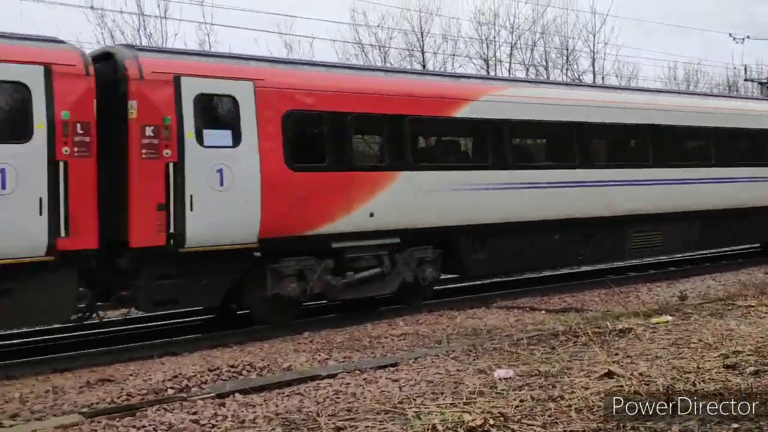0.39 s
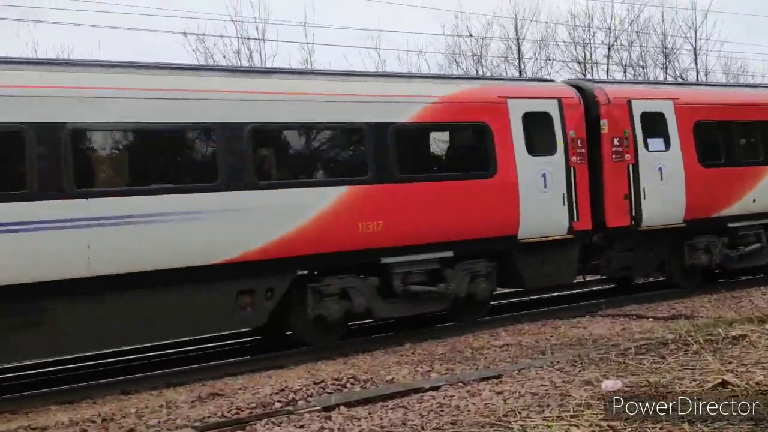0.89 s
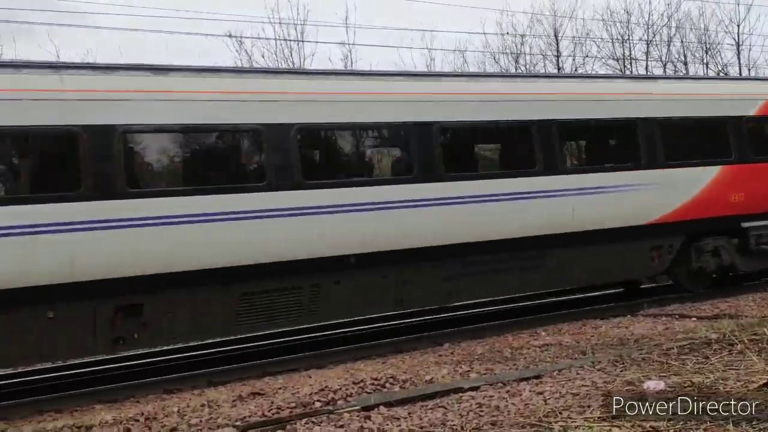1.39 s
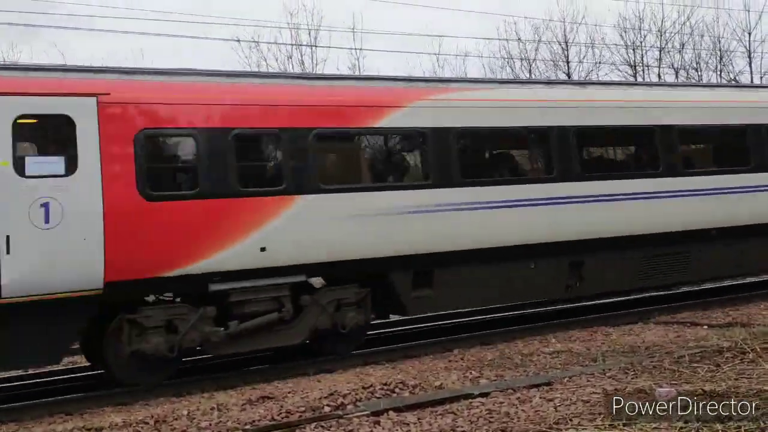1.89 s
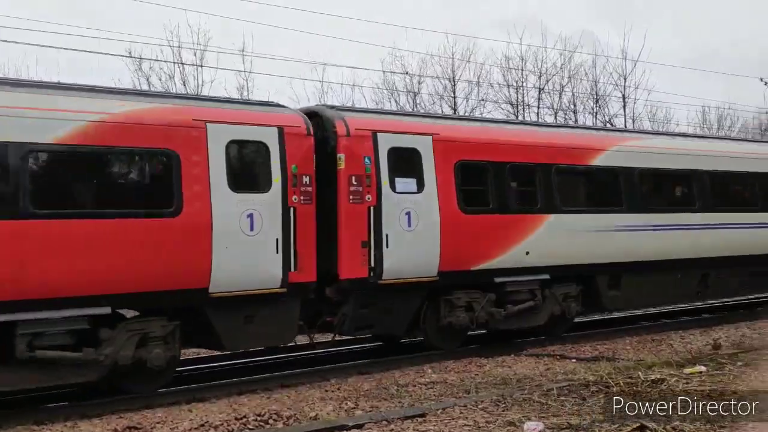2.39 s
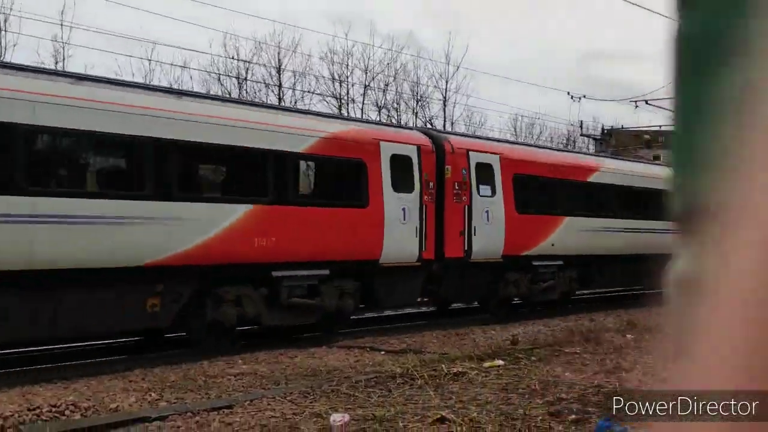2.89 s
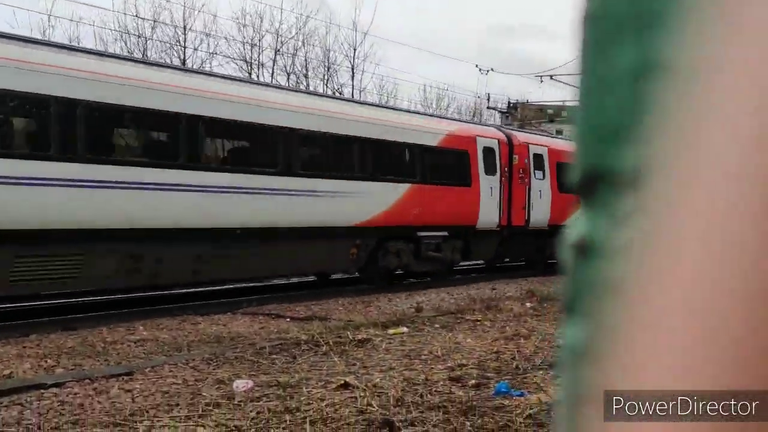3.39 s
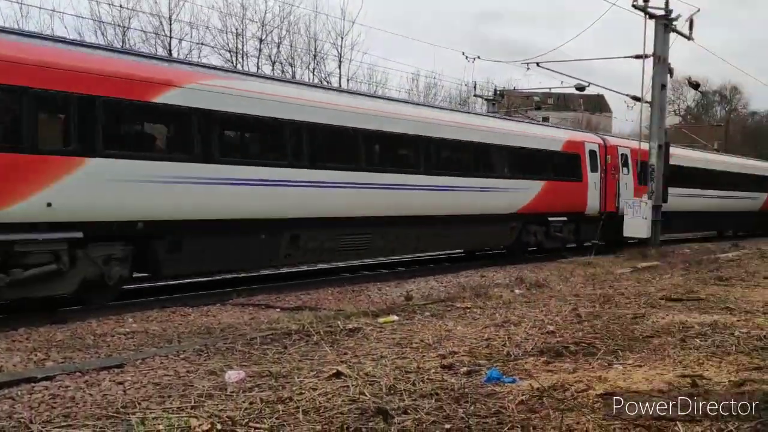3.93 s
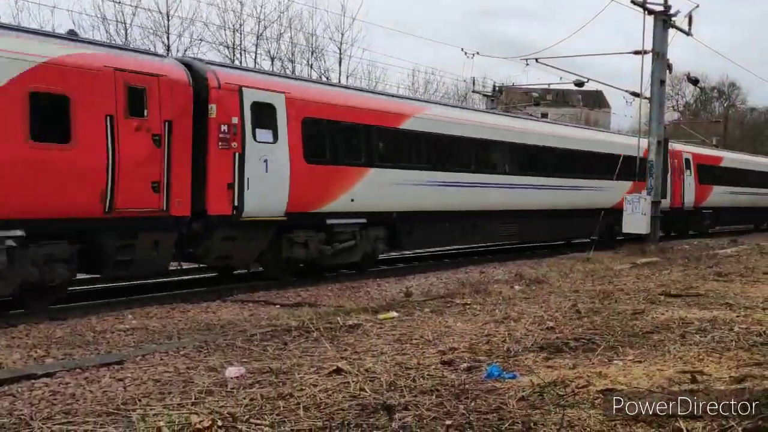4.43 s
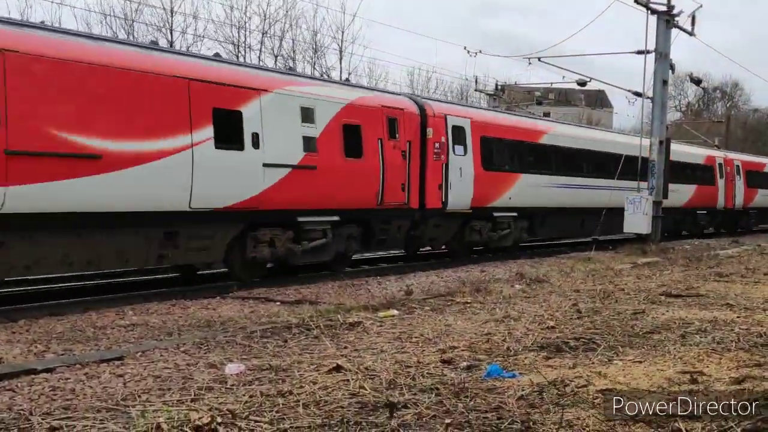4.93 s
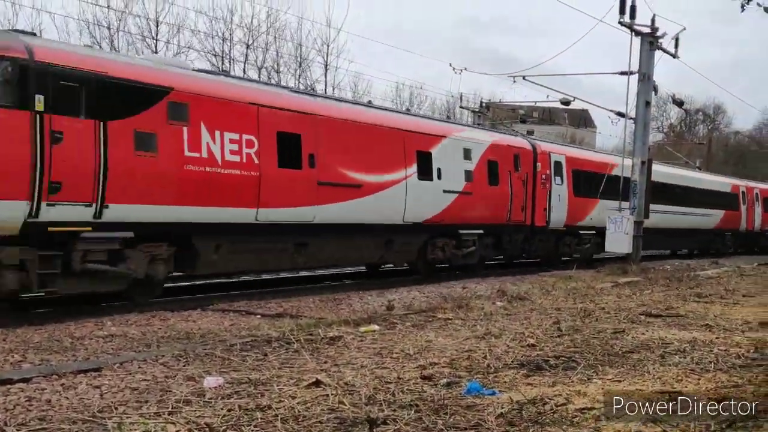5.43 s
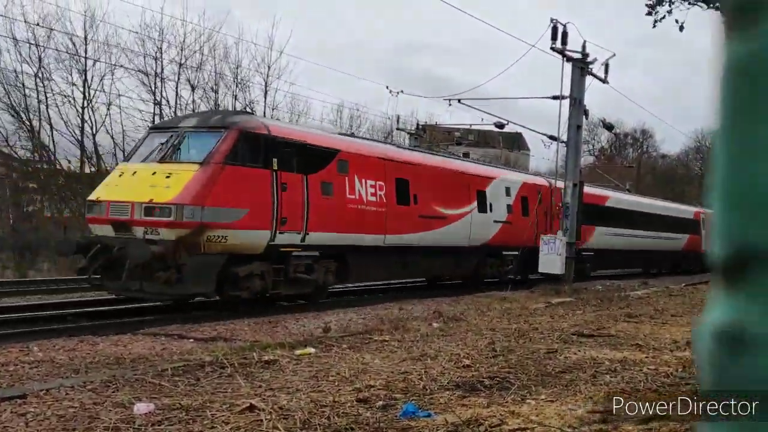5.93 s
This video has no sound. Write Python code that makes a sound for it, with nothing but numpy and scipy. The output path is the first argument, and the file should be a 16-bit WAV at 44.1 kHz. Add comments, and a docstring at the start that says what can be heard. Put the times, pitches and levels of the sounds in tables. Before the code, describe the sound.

Passenger coaches roll past close by, wheel flanges hissing brightly over low rumble and paired axle thumps, before the hiss fades and wind buffets the microphone.

```python
"""Bright flange hiss opens, soon with axle thumps over a rail joint, as passenger coaches roll past close by on a curve.
Hiss: banded noise that drives ringing wheel modes; bites, rough notes, hiss patches and thin whistles stand out of it.
Thumps: damped tone bursts with rattle and clatter. Treads: rumble and roar in noise bands. Loose metal clanks.
Wind: lumpy low noise and short buffets at two unlike microphone ports."""
import sys
import numpy as np
from scipy import signal
from scipy.fft import rfft, irfft, next_fast_len
from scipy.io import wavfile
from scipy.ndimage import uniform_filter1d

SR = 44100
rng = np.random.default_rng(int(sys.argv[2]) if len(sys.argv) > 2 else 0)


def dump_mix(stems):
    """Bounce the given channels to the path in sys.argv[1] as a 16-bit WAV at rate SR."""
    frames = np.atleast_2d(stems).T  # one column per channel
    limited = np.clip(frames, -1, 1)  # hard clip at full scale
    pcm = np.round(limited * 32767).astype(np.int16)
    wavfile.write(sys.argv[1], SR, pcm)


def how_loud(loudness_db):
    """Turn decibels into a plain amplitude multiplier (0 dB gives 1, 20 dB gives 10)."""
    steps = np.asarray(loudness_db, float) / 20
    return 10 ** steps


N = 267246

# All levels are relative.
# port response: f/Hz, left over right/dB
PORT_BALANCE = [(60, -7), (110, -7), (200, -5.5), (380, -3), (700, -1.5), (1290, -7), (2380, -3.5),
                (4400, -7), (8120, -1), (15000, 26)]
# left-right likeness of noise: f/Hz, common power share/1
PORT_LIKENESS = [(60, .6), (120, 0.85), (260, .8), (500, .6), (900, 0.4), (1800, 0.35), (4000, 0.15),
                 (15000, 0.03)]
# wind: t/s, level/dB, left over right/dB
WIND_COURSE = [(0.0, -32, 3), (0.22, -34, -22), (0.45, -34.5, 2), (0.78, -30.5, -7), (1.25, -25.5, -5),
               (1.36, -30.5, -0.5), (1.95, -32.5, -4), (2.35, -34, 0), (2.6, -35, -1), (2.88, -31.5, 0),
               (3.0, -35, -7), (3.6, -26, -15), (3.8, -37.5, -18), (4.75, -32.5, -6), (4.9, -32, -4),
               (5.15, -30.5, 3), (5.6, -36.5, 1), (5.77, -18.5, -14), (5.815, -26.5, -3), (5.87, -22.5, -9),
               (5.94, -31, 0), (5.98, -12.5, -19), (6.06, -20, -20)]
# buffets at each port: onset t/s, level/dB, time to peak/s
LEFT_PORT_BUFFETS = [(5.65, -13, 0.0068), (5.73, -16, 0.014), (5.76, -17, 0.017), (5.78, -22, 0.0073),
                     (5.823, -22, .006), (5.895, -21, 0.0077), (5.95, -15.5, .012), (5.98, -17, 0.0051),
                     (6.04, -14, .005)]
RIGHT_PORT_BUFFETS = [(0.791, -20.5, 0.02), (1.129, -22, 0.011), (3.326, -22, 0.0083), (3.412, -27, 0.012),
                      (1.937, -14.5, 0.0079), (3.206, -26, 0.011), (3.589, -22, 0.0087),
                      (3.874, -22.5, 0.023), (5.735, -12, 0.0083), (5.764, -16.5, 0.0058),
                      (5.788, -18, 0.0041), (5.834, -30, .01), (5.859, -7, 0.012), (5.9, -11.5, 0.01),
                      (5.919, -24, 0.0058), (5.965, -9, 0.0078), (5.987, -11, 0.0067),
                      (5.999, -12.5, 0.011), (6.025, -10.5, 0.0085)]
# faint treble hiss under the train: f/Hz, density/dB
HISS_FLOOR_SPECTRUM = [(2350, -33), (4000, -8), (6260, -9), (8590, -26), (12600, 17), (15800, -34)]
# treads on the rail: t/s, rumble level/dB, roar level/dB
TREAD_COURSE = [(0.0, -30, -38.5), (0.64, -38, -40), (0.8, -23, -40), (1.0, -28, -39), (1.3, -30, -39.5),
                (1.7, -28.5, -39), (2.38, -38, -42), (2.8, -28, -37), (3.3, -31, -39), (3.7, -29.5, -41.5),
                (4.5, -31, -39), (4.85, -34, -41), (5.2, -31.5, -39), (5.5, -34, -41.5), (6.06, -23.5, -50)]
# tread spectra: f/Hz, density/dB
RUMBLE_SPECTRUM = [(35, -32), (60, 2.5), (140, -2.5), (241, -0.5), (301, -25.5), (375, -14), (420, -15),
                   (550, -45), (920, -120)]
ROAR_SPECTRUM = [(180, -31), (300, -1), (384, -3.5), (608, -9.5), (1120, -13), (1540, -8), (1690, -9.5),
                 (1860, -27), (2300, -6.5), (3160, -13.5), (3950, -14), (5000, -12), (6500, -42),
                 (11000, -120)]
# rail resonances in the roar: f/Hz, width/Hz, level/dB
RAIL_RESONANCES = [(1692, 25, -9.5), (2268, 63, -10)]
# loose metal under the coaches: t/s, f/Hz, level/dB
METAL_CLANKS = [(.722, 880, -36), (.915, 620, -30), (.945, 800, -38), (1.325, 736, -31.5), (1.51, 850, -31),
                (2.15, 680, -38), (2.435, 950, -33), (2.565, 680, -29), (2.715, 685, -30),
                (2.755, 820, -34), (4.93, 770, -27), (5.11, 1030, -31), (5.115, 1390, -29),
                (5.12, 560, -30), (5.355, 2320, -32), (5.355, 1970, -37)]
# bogies over the joint: t/s, first axle level/dB, second axle level/dB, later knock level/dB, axle f/Hz
BOGIE_HITS = [(0.151, -19.5, -14.5, -25.5, 147), (0.719, -17, -13.5, -21, 150.6),
              (1.946, -19.5, -15.5, -25, 152), (2.518, -15.5, -15.5, -26.5, 148.5),
              (3.748, -20, -16.5, -33, 142), (4.321, -17.5, -15, -26, 147), (5.158, -17, -15.5, -42, 145)]
# other knocks, some of them axles near the end: t/s, level/dB, f/Hz
OTHER_KNOCKS = [(.893, -25, 173), (0.956, -24, 254), (0.986, -24, 238), (2.041, -32, 110), (2.75, -25, 250),
                (2.84, -22.5, 93), (3.415, -24, 109), (5.572, -21, 147), (1.519, -19, 103),
                (1.686, -23.5, 139), (4.052, -20.5, 100), (4.804, -20, 121), (4.939, -28, 220),
                (5.071, -21, 120), (5.105, -15, 117), (5.289, -20, 136)]
# thin whistles, steady or sliding: t/s, length/s, from f/Hz, to f/Hz, level/dB
THIN_WHISTLES = [(3.515, .09, 10950, 11950, -28), (1.87, .11, 13280, 13380, -29),
                 (3.75, .07, 11780, 11850, -22), (3.94, .11, 11900, 11950, -28),
                 (1.49, .08, 12850, 12900, -29), (2.04, .07, 13650, 13550, -29),
                 (2.11, .07, 13150, 13150, -29), (3.85, .1, 12800, 12900, -31)]
# rough notes and broader patches of treble hiss: t/s, half length/s, f/Hz, level/dB, width/Hz
ROUGH_NOTES = [(0.13, 0.092, 8560, -29, 40), (0.166, 0.39, 14900, -35, 60), (0.278, 0.24, 10700, -39, 40),
               (1.121, 0.24, 13500, -21, 400), (1.278, 0.15, 13200, -17, 700),
               (1.302, 0.077, 5490, -26, 60), (1.402, 0.071, 9400, -23.5, 50),
               (1.479, 0.085, 13300, -20, 250), (1.582, 0.15, 13150, -20, 200),
               (2.012, 0.1, 13200, -19.5, 400), (2.103, 0.24, 13300, -23, 250),
               (2.885, 0.083, 13560, -16, 450), (3.27, 0.095, 6180, -22, 60),
               (3.103, 0.17, 13100, -22, 400), (3.367, 0.18, 14500, -21.5, 100),
               (3.509, 0.094, 11170, -19, 250), (3.549, 0.1, 11950, -22.5, 350),
               (3.668, 0.17, 11800, -16.5, 450), (3.693, 0.05, 11830, -14, 300),
               (3.71, .04, 13200, -27, 150), (1.3, 0.1, 13800, -21, 250), (2.31, .07, 13700, -24, 300),
               (3.734, 0.08, 5310, -26, 45), (3.836, 0.17, 11880, -22, 200), (3.84, 0.13, 12800, -23, 400),
               (3.93, 0.074, 11300, -22, 200), (4.06, .3, 3470, -33.5, 1400),
               (3.052, 0.23, 3600, -45, 1400), (4.195, 0.12, 2170, -34, 90), (4.226, 0.1, 3490, -31, 40),
               (4.62, 0.15, 13200, -34, 60), (4.66, .12, 10600, -39, 40), (5.006, 0.17, 12900, -29, 400),
               (5.008, 0.051, 8400, -39, 900), (5.03, 0.17, 6100, -33.5, 300),
               (5.41, 0.21, 12400, -30.5, 1000), (5.857, 0.11, 7700, -38, 700),
               (5.848, 0.092, 11600, -30, 900)]
# sudden flange bites: t/s, level/dB, half rise time/s, fade time constant/s, lowest f/Hz, ring f/Hz, ring level/dB
FLANGE_BITES = [(0.526, -40, .004, 0.017, 6500, 13300, -54), (2.599, -32, .002, 0.0086, 5000, 12900, -36),
                (4.059, -35, .002, 0.024, 3200, 8000, -38), (5.0065, -21.5, .002, 0.012, 8000, 12800, -22),
                (5.353, -30, 0.0025, 0.016, 2500, 6540, -29),
                (5.8446, -18, 0.0026, 0.015, 6900, 7460, -17.5)]
# flange on rail side: t/s, hiss level/dB, lower-treble tilt/dB (its mean is taken off)
RUB_COURSE = [(0.0, -20.5, -7.5), (0.17, -19, -4.5), (0.3, -26, -5.5), (0.522, -46, 7.5), (0.532, -23, -17),
              (0.66, -21.5, -9), (0.79, -31.5, 3), (0.84, -24, -4.5), (1.4, -26.5, -4.5), (1.9, -24, -3),
              (2.22, -35.5, 4), (2.38, -24, -8.5), (2.595, -29.5, 0), (2.603, -23, 0), (2.75, -21, -8),
              (2.97, -21, -5.5), (3.2, -19.5, -1.5), (3.6, -26, -4), (3.815, -26.5, -7.5), (3.83, -24, -2),
              (4.054, -27.5, -3.5), (4.063, -18.5, -9.5), (4.3, -19.5, -6), (4.62, -23, -0.5),
              (4.78, -42, -6), (5.005, -39, 1.5), (5.012, -26.5, -7), (5.28, -42.5, 0), (5.33, -60, 12),
              (5.39, -48, 4), (5.41, -38.5, -7.5), (5.49, -32, -8.5), (5.7, -45.5, 4), (5.83, -49, 7),
              (5.87, -34, -33), (6.06, -35, -18)]
# topmost treble of the rubbing: t/s, tilt/dB
TOP_COURSE = [(0, -4), (.55, 8), (1.1, 2.5), (2.4, 9), (3.5, -11), (3.8, 0), (4.1, -7), (4.8, 1),
              (5.1, -12), (6.06, -23)]
# rubbing hiss: f/Hz, density/dB
RUB_SPECTRUM = [(1760, -48), (3000, -17), (3520, -10.5), (3910, -7), (4220, -13), (5020, -5.5), (5270, -3),
                (6220, -4), (6720, -2.5), (10100, -5), (11600, 5), (12600, -3.5), (13700, -1), (14800, 2),
                (15800, -8.5)]
# wheel disc modes: nominal f/Hz, level/dB, t60/s
WHEEL_MODES = [(2750, -44, .15), (3550, -38, .15), (4400, -38, .15), (5350, -36, .12), (6200, -32, .12),
               (6750, -32, .15), (7260, -31, .15), (8000, -31, .15), (8550, -32, .15), (9220, -31, .2),
               (9900, -33, .15), (10660, -30, .25), (11200, -31, .06), (11840, -29, .06), (12400, -31, .06),
               (12960, -29, .08), (13300, -28, .15), (13800, -29, .08), (14300, -33, .15),
               (14700, -33, .15), (15280, -34, .15)]


def rms_one(x):
    """Level 1 for the mean of the channels."""
    return x / np.sqrt(np.mean(np.atleast_2d(x).mean(0) ** 2) + 1e-20)


def in_time(rows):
    """Curve columns at every sample."""
    s, *columns = np.transpose(rows)
    return [np.interp(np.arange(N) / SR, s, c) for c in columns]


def at_hz(points, hz):
    """A spectrum read on a log axis."""
    points_hz, values = np.transpose(points)
    return np.interp(np.log(hz), np.log(points_hz), values)


def drift(rate_hz):
    """Slow chance of spread 1: noise through two equal poles at rate_hz, at SR / 40."""
    r = np.exp(-80 * np.pi * rate_hz / SR)
    slow = signal.lfilter([1], [1, -2 * r, r * r], rng.standard_normal(N // 40 + 2002))[2000:]
    return np.interp(np.arange(N) / 40, np.arange(len(slow)), rms_one(slow))


def flicker(spread_db, rate_hz, low, high):
    """Gain that drifts in dB, clipped at low and high spreads."""
    return how_loud(spread_db * np.clip(drift(rate_hz), low, high))


def band_pass(x, low_hz, high_hz, order=2):
    """Butterworth band."""
    return signal.sosfilt(signal.butter(order, [low_hz, high_hz], "band", fs=SR, output="sos"), x)


def resonance(x, hz, width_hz):
    """Two poles, gain 1 on top."""
    r = np.exp(-np.pi * width_hz / SR)
    poles = [1, -2 * r * np.cos(2 * np.pi * hz / SR), r * r]
    return signal.lfilter([(1 - r * r) / 2, 0, (r * r - 1) / 2], poles, x + 1e-18)


def panned(db):
    """Gains of the two sides for a left-over-right step; their power adds to 4."""
    left = 1 / (1 + how_loud(-2 * np.asarray(db)))
    return 2 * np.sqrt(np.array([left, 1 - left]).reshape(2, -1))


def pair(hz, size=N):
    """White noise at the two ports, partly alike, weighted by the ports' response."""
    alike = np.clip(at_hz(PORT_LIKENESS, hz), 0, 1)
    common, left, right = rng.standard_normal((3, size))
    own = np.array([left, right])
    return panned(at_hz(PORT_BALANCE, hz)) * (np.sqrt(alike) * common + np.sqrt(1 - alike) * own)


def banded_noise(spectrum, edges_hz, patchy_db, rate_hz, lower_db=0, upper_db=0, knees_hz=(9500, 13600)):
    """Bands of noise, each flickering partly on its own; two tilts move the bands outside the knees."""
    out, together = 0, drift(rate_hz)
    for low, high in zip(edges_hz, edges_hz[1:]):
        hz = np.sqrt(low * high)
        band = band_pass(pair(hz), low, high)
        tilt_db = lower_db / (1 + (hz / knees_hz[0]) ** 6) + upper_db / (1 + (knees_hz[1] / hz) ** 16)
        flicker_db = patchy_db * (0.31 * together + np.clip(drift(rate_hz), -2.5, 1.6))
        out = out + band * how_loud(at_hz(spectrum, hz) + tilt_db + flicker_db)
    return out


def wind():
    """Lumpy turbulence, partly its own at each port; a wandering upper edge rides on the bass."""
    bass_db, pan_db = in_time(WIND_COURSE)
    edge_gain = how_loud(-17.5 + 7.5 * np.clip(drift(2.4), -2, 1.2))
    lumps = np.array([flicker(4.0, 9.3, -2, 1.5), flicker(3.2, 40.0, -2, 1.1)])  # left, right
    air = rng.standard_normal((2, N)) + 1.1 * rng.standard_normal(N)
    bass = band_pass(air, 22, 130)
    edge = band_pass(air, 130, 400)
    gust = lumps * bass / np.std(bass) + edge_gain * lumps * edge / np.std(edge)
    return how_loud(bass_db) * panned(pan_db) * gust


def buffets():
    """Short bursts of turbulence, each port its own, steeply duller towards the treble; hard ones crackle."""
    crackle_db = -24
    t, out = np.arange(N) / SR, np.zeros((2, N))
    for side, (rows, cut_hz) in enumerate([(LEFT_PORT_BUFFETS, 190), (RIGHT_PORT_BUFFETS, 675)]):
        shape = np.zeros(N)
        for s, db, peak_s in rows:
            span = slice(int(s * SR) + 1, int((s + 5 * peak_s) * SR))
            age = (t[span] - s) / peak_s
            shape[span] += how_loud(db) * age * np.exp((1 - age ** 2) / 2)
        air, grit = rng.standard_normal((2, N))
        air = band_pass(air, 70, 330, order=1)
        air = signal.sosfilt(signal.butter(2, cut_hz, fs=SR, output="sos"), air)
        air = air / np.sqrt(uniform_filter1d(air ** 2, size=900) + 1e-12)  # every buffet at full strength
        grit = rms_one(band_pass(grit, 800, 3200))
        crackle = how_loud(crackle_db) * shape ** 2 / shape.max() * how_loud(3.7 * drift(90.0)) * grit
        out[side] = shape * rms_one(air) + crackle
    return out


def hiss_floor():
    """Faint flickering treble hiss under the train, in noise bands."""
    edges_hz = np.geomspace(4000, 16000, 6)
    return how_loud(-41) * rms_one(banded_noise(HISS_FLOOR_SPECTRUM, edges_hz, patchy_db=-5.0, rate_hz=1.76))


def treads():
    """Rough wheels on rough rail: a rumble from the track and a roar with two rail resonances."""
    rumble_db, roar_db = in_time(TREAD_COURSE)
    rumble = rms_one(banded_noise(RUMBLE_SPECTRUM, np.geomspace(60, 400, 8), patchy_db=5.0, rate_hz=14.0))
    roar = banded_noise(ROAR_SPECTRUM, np.geomspace(350, 5000, 12), patchy_db=3.5, rate_hz=16.6)
    roar = how_loud(2.0) * rms_one(roar)
    for hz, width_hz, db in RAIL_RESONANCES:
        ring = rms_one(resonance(pair(hz), hz, width_hz))
        roar = roar + how_loud(db) * flicker(3.0, 7.0, -2, 1.2) * ring
    return how_loud(rumble_db) * rumble + how_loud(roar_db) * roar


def clanks():
    """Loose metal: short rough rings of one pitch each."""
    peak_s, width_hz = 0.011, 120
    out, age = np.zeros((2, N)), np.arange(SR // 8) / SR / peak_s
    for s, hz, db in METAL_CLANKS:
        common, left, right = rng.standard_normal((3, len(age)))
        ring = resonance(common + 0.68 * np.array([left, right]), hz, width_hz)
        ring = ring * age * np.exp(1 - age)
        at = int(s * SR)
        out[:, at:at + len(age)] += how_loud(db) * panned(-2.2) * ring / np.abs(ring).max()
    return out


def thumps():
    """Sleeper and ballast give way in a few cycles; a weaker rebound, a puff of rattle, a lumpy clatter."""
    wheelbase_s, later_knock_s, later_knock_hz = .193, .398, 140  # both delays after the first axle
    pan_db, rattle_db, rattle_spread_db = -2.5, -7, 2
    clatter_db, clatter_s = -2.5, 0.028
    hits = []
    for s, first_db, second_db, later_db, hz in BOGIE_HITS:
        hits += [(s, first_db, hz), (s + wheelbase_s, second_db, hz), (s + later_knock_s, later_db, later_knock_hz)]
    hits += OTHER_KNOCKS
    out, t = np.zeros((2, N + SR)), np.arange(SR // 4) / SR
    rattles = band_pass(rng.standard_normal((len(hits), 2, len(t))), 220, 900)
    clatters = band_pass(rng.standard_normal(rattles.shape), 110, 330)
    rattles = rattles + rattles.mean(1, keepdims=True)  # partly alike at the two ports
    clatters = clatters + clatters.mean(1, keepdims=True)
    sides = how_loud(np.array([[pan_db / 2], [-pan_db / 2]]))
    chances = rng.standard_normal(len(hits))
    for (s, db, hz), rattle, clatter, chance in zip(hits, rattles, clatters, chances):
        blow = np.exp(-((t - .011) / 0.0084) ** 2) * np.cos(2 * np.pi * hz * (t - .011))
        rebound = 0.34 * np.exp(-((t - .048) / 0.02) ** 2) * np.cos(2 * np.pi * hz * (t - .048))
        puff = rattle * (1 - np.exp(-t / 0.0047)) * np.exp(-t / 0.019)
        puff = how_loud(rattle_db + rattle_spread_db * chance) * puff
        tail = how_loud(clatter_db) * clatter * t / clatter_s * np.exp(1 - t / clatter_s)
        at = int(s * SR)
        out[:, at:at + len(t)] += how_loud(db + 4.0) * sides * (blow + rebound + puff + tail)
    return out[:, :N]


def whistles():
    """Thin wavering whistles, steady or sliding, mostly at the left port: sines of wandering frequency."""
    waver_hz = 45 * drift(45.0)
    out, ragged = np.zeros((2, N)), flicker(3.0, 30.0, -2, 1.2)
    for s, length_s, from_hz, to_hz, db in THIN_WHISTLES:
        span = slice(int(s * SR), int((s + length_s) * SR))
        age = np.linspace(0, 1, span.stop - span.start)
        hz = from_hz + (to_hz - from_hz) * np.sin(np.pi / 2 * age) + waver_hz[span]
        whistle = np.sin(2 * np.pi * np.cumsum(hz) / SR)
        swell = np.sqrt(2 * np.sin(np.pi * age)) * ragged[span]
        out[:, span] += how_loud(db) * swell * panned(at_hz(PORT_BALANCE, to_hz)) * whistle
    return out


def rough_notes():
    """Rough notes and broader patches of treble hiss, swelling and dying away: resonant noise."""
    out, t = np.zeros((2, N)), np.arange(N) / SR
    ragged = flicker(2.6, 11.0, -2, 1.2)  # the grip comes and goes
    for s, half_s, hz, db, width_hz in ROUGH_NOTES:
        span = slice(int(s * SR), int((s + 2 * half_s) * SR))
        age = (t[span] - s) / half_s
        common, left, right = rng.standard_normal((3, len(age)))
        note = resonance(common + 1.1 * np.array([left, right]), hz, width_hz)
        note = resonance(note, hz, 3.9 * width_hz)
        swell = np.sin(np.pi * np.clip(age / 2, 0, 1) ** .5) * ragged[span]
        out[:, span] += how_loud(db) * swell * panned(at_hz(PORT_BALANCE, hz)) * note / np.std(note) / 2
    return out


def bites():
    """A flange bites suddenly: a burst of hiss above some pitch and a short ring of one mode."""
    ring_s, ring_width_hz = 0.0056, 300
    out, age = np.zeros((2, N + SR)), np.arange(SR // 4) / SR
    colour = rms_one(banded_noise(RUB_SPECTRUM, np.geomspace(2600, 16200, 6), patchy_db=2.0, rate_hz=30))
    for s, db, half_rise_s, fade_s, low_hz, ring_hz, ring_db in FLANGE_BITES:
        at = int(s * SR)
        onset = np.sin(np.pi / 2 * np.clip(age / half_rise_s / 2, 0, 1)) ** 2
        hiss = np.roll(colour, -at, axis=1)[:, :len(age)]
        burst = signal.sosfilt(signal.butter(12, low_hz, "high", fs=SR, output="sos"), hiss)
        ring = rms_one(resonance(pair(ring_hz, size=len(age)), ring_hz, ring_width_hz))
        burst = how_loud(db) * burst * np.exp(-age / fade_s)
        ring = how_loud(ring_db) * ring * np.exp(-age / ring_s)
        out[:, at:at + len(age)] += onset * (burst + ring)
    return out[:, :N]


def flanges():
    """Rubbing hiss; it drives the modes of three wheels, which ring on when the contact lets go."""
    feed_db = 3
    hiss_db, lower_db = in_time(RUB_COURSE)
    hiss_db = hiss_db + .8 * drift(14)  # the rubbing flutters
    hiss = rms_one(banded_noise(RUB_SPECTRUM, np.geomspace(2600, 16200, 21), patchy_db=2.4, rate_hz=8,
                                lower_db=lower_db - np.mean(lower_db), upper_db=in_time(TOP_COURSE)[0]))
    out = how_loud(hiss_db) * hiss
    force = how_loud(hiss_db + feed_db) * rng.standard_normal((3, N))  # one row a wheel
    for mode_hz, db, t60_s in WHEEL_MODES:
        width_hz = np.log(1000) / (np.pi * t60_s)
        wheels_hz = mode_hz * (1 + 0.0152 * np.clip(rng.standard_normal(3), -2, 2))  # worn wheels differ
        for hz, rub in zip(wheels_hz, force):
            grip = rub * flicker(5.0, 8.0, -3, 1.6)  # each mode is fed unevenly
            ringing = resonance(grip, hz, width_hz) / np.sqrt(np.pi * width_hz / SR)
            out += how_loud(db) * panned(at_hz(PORT_BALANCE, hz)) * ringing
    return out


def scene():
    """The treble of the train reaches the right port a little late; its bass nearly together."""
    right_lag_s, lag_from_hz = 22 / SR, 1000
    train = hiss_floor() + treads() + clanks() + thumps() + whistles() + rough_notes() + bites() + flanges()
    size = next_fast_len(N + 64)
    hz = np.arange(size // 2 + 1) * SR / size
    lag_s = right_lag_s * hz ** 4 / (hz ** 4 + lag_from_hz ** 4)
    train[1] = irfft(rfft(train[1], size) * np.exp(-2j * np.pi * hz * lag_s), size)[:N]
    return wind() + buffets() + train


def low_pass(x):
    """Removes everything above the highest recorded frequency."""
    return signal.sosfilt(signal.butter(12, 15970, fs=SR, output="sos"), x)


def record(dry):
    """The top is cut and peaks are rounded."""
    cut = signal.sosfilt(signal.ellip(10, .5, 70, 15480, fs=SR, output="sos"), dry)
    mix = 0.94 * np.tanh(cut / 0.94)
    return low_pass(mix)


dry = scene()
out = record(dry)
dump_mix(out)
```